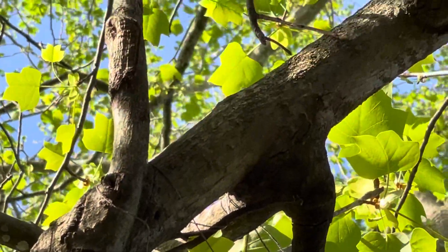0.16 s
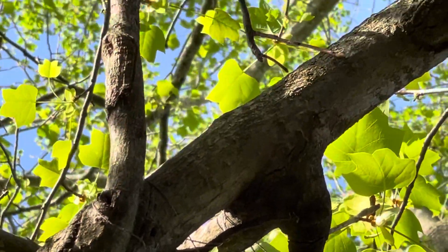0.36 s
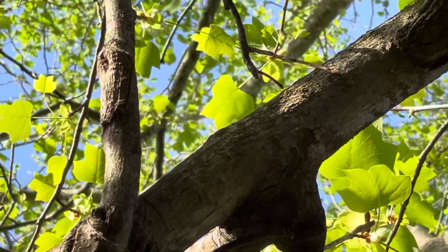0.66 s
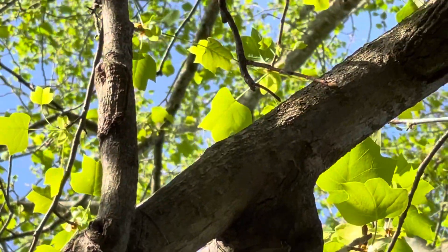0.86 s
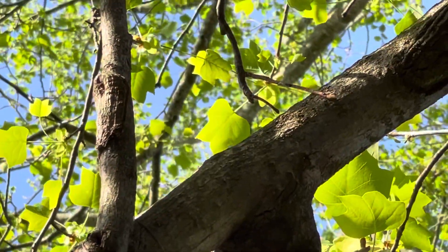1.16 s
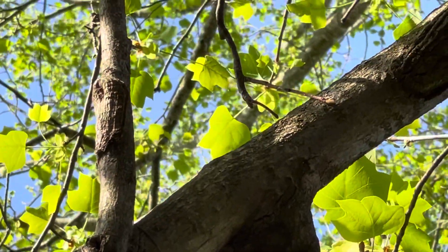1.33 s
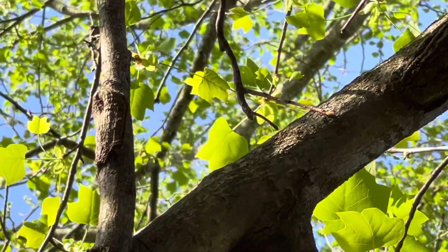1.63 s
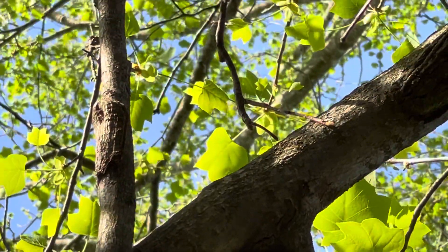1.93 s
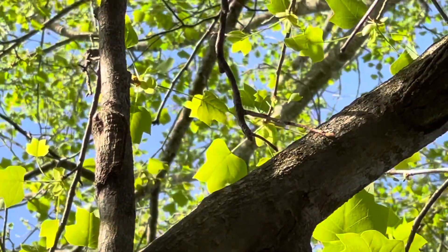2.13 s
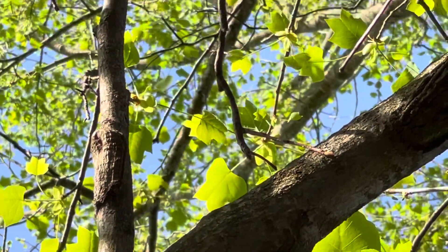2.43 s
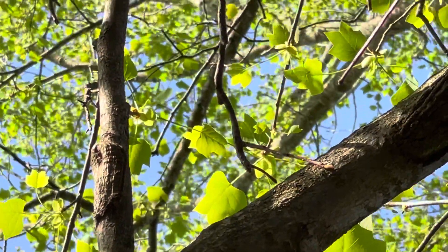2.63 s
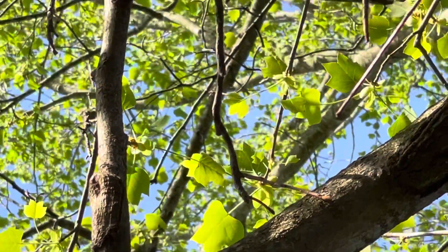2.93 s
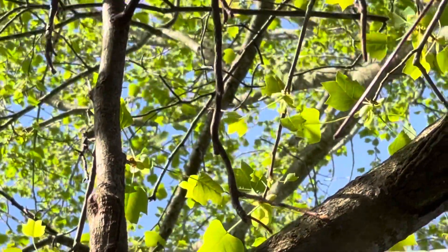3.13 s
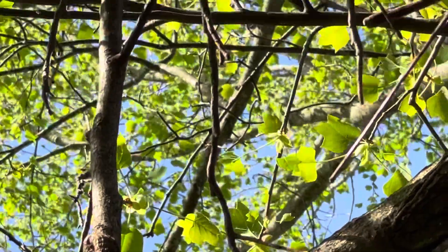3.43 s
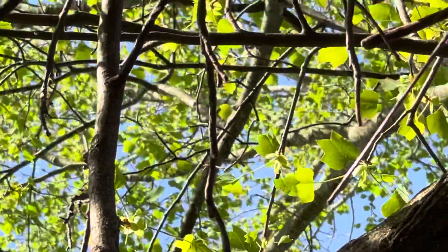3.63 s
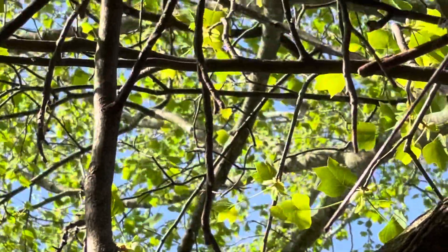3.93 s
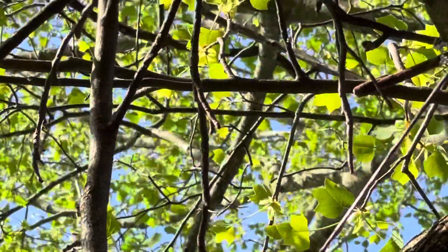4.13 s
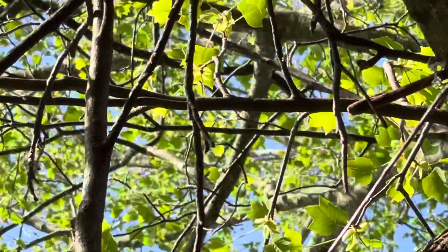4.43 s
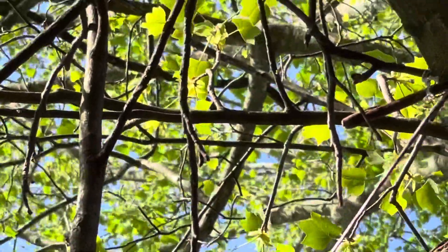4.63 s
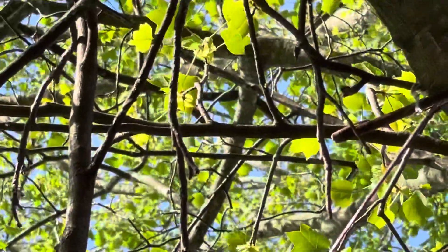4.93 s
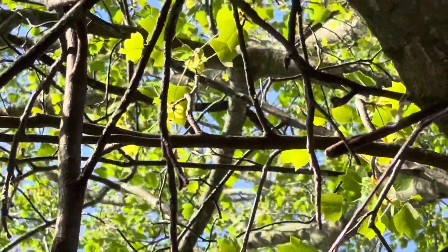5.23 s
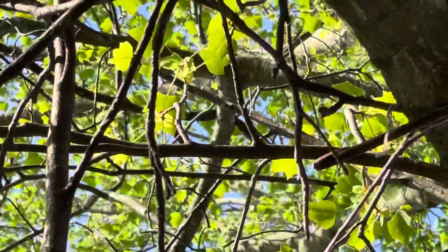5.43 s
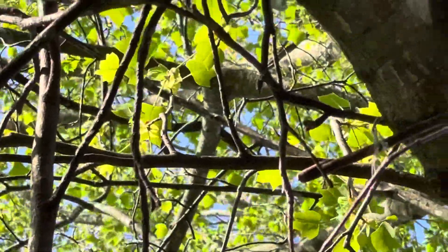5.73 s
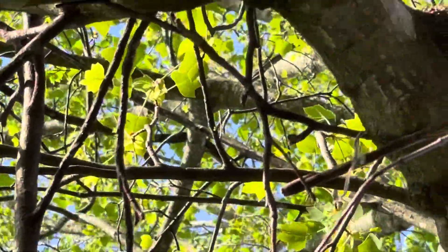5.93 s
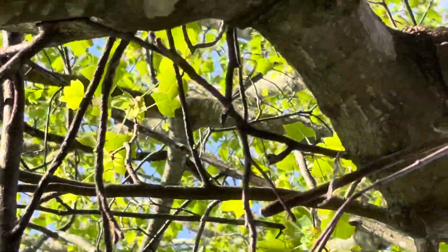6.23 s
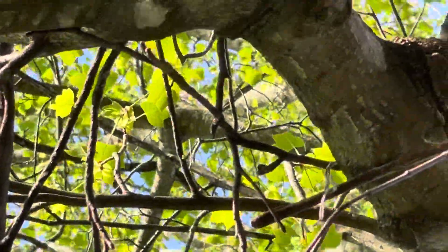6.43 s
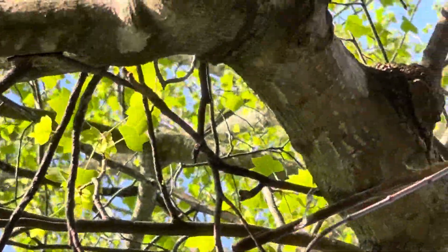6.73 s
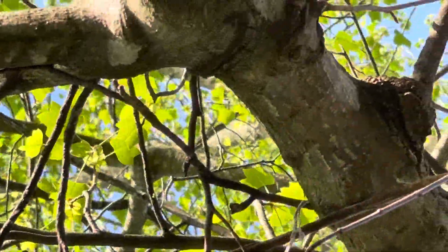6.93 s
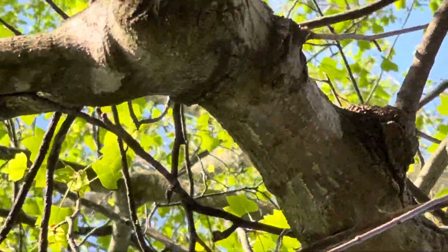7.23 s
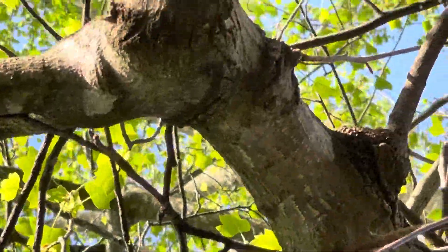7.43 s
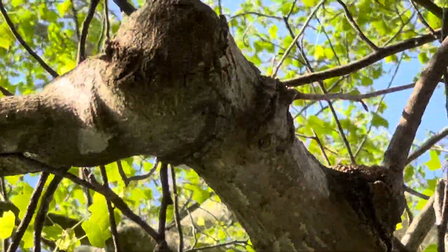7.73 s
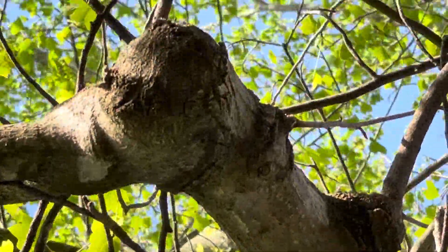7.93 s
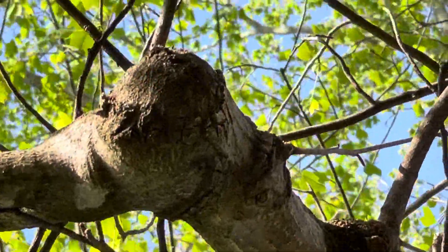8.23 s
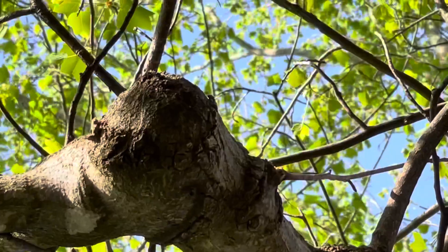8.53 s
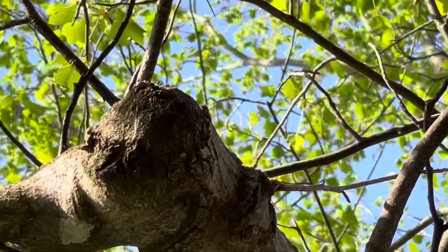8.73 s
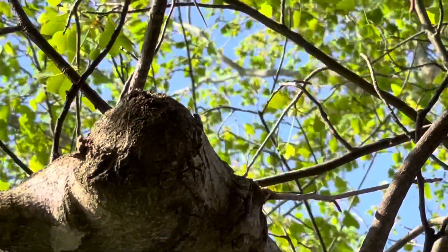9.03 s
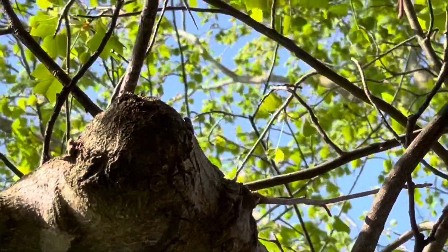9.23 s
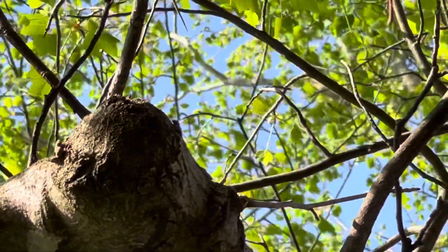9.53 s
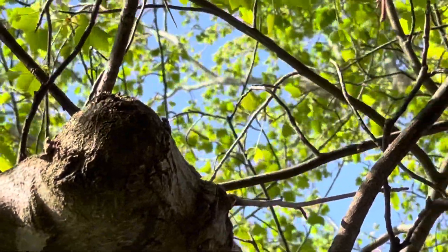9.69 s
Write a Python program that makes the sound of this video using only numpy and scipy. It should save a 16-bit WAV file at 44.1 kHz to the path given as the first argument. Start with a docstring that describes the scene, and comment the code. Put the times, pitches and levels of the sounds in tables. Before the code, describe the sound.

Outdoor birdsong, fast and changeable: bright whistles, plunging chirps and quick pips, separated by short gaps, then scratchy rasps between clear rising whistles and sustained high notes. It ends with a short two-toned note and a soft falling slur. A handheld microphone under trees also catches low wind buffets from three seconds, steady hiss, faint traffic rumble and a barely audible motor hum.

```python
"""A mockingbird in a leafy tree opens mid-note with a two-voiced whistle, a falling slur and a high swoop.
A hoarse whine, far thin replies, a second swoop and duet, and a down-sweep breaking into a growl follow.
From about 3 s harsh rasps alternate with low rising whistles, pips and long hooked notes, to a last duet and slur.
Notes are gliding sines, rasps are slaps, puffs and squeals; noise tails scatter them off trunks and leaves.
Filtered-noise gusts thump on the microphone from about 3 s, over steady hiss, traffic rumble and a motor hum."""
import sys
import numpy as np
from scipy import signal
from scipy.fft import rfft, irfft
from scipy.io import wavfile
from scipy.ndimage import uniform_filter1d, map_coordinates

SR = 44100
rng = np.random.default_rng(int(sys.argv[2]) if len(sys.argv) > 2 else 0)


def output_pcm(signal):
    """Save a mono or channel-first signal as 16-bit PCM at the path in sys.argv[1].

    Samples are clipped to [-1, 1] before scaling.
    """
    pcm = np.clip(np.atleast_2d(signal).T, -1, 1) * 32767
    wavfile.write(sys.argv[1], SR, np.round(pcm).astype(np.int16))


N = 434826
TIME = np.arange(N) / SR
FREQS = np.maximum(np.arange(N // 2 + 1) * SR / N, 1)
TOP_HZ = 15600  # nothing passes the microphone above this


def undb(db):
    """Decibels to gain."""
    return 10 ** (np.asarray(db) / 20)


def unit(x):
    """Scale to rms 1."""
    return x / np.sqrt(np.mean(x ** 2))


def curves(rows, t=TIME):
    """Each later column of a table, joined by straight lines over its first column and read at t."""
    s, *columns = np.transpose(rows)
    return [np.interp(t, s, c) for c in columns]


def spectrum(points):
    """(f/Hz, value) points spread over a log-frequency axis."""
    hz, value = np.transpose(points)
    return np.interp(np.log(FREQS), np.log(hz), value)


def colour(x, points):
    """Filter by a (f/Hz, level/dB) outline."""
    return irfft(rfft(x) * undb(spectrum(points)), N)


def walk(rate, size):
    """Smooth random wander of spread about 1, with `rate` random knots per second."""
    knots = rng.standard_normal(4096)
    return map_coordinates(knots, [np.arange(size) * rate / SR], order=3, mode="wrap")


def stereo(mid, wide):
    """Left and right from middle and side."""
    return np.array([mid + wide, mid - wide])


def side(points, waver, flutter_db, edge_s=0.0028, shake=0.0015):
    """One side of the syrinx follows (t/s, f/Hz, level/dB) points: sample indices, phase and amplitude."""
    start, end = points[0][0], points[-1][0]
    first = max(int((start - edge_s) * SR), 0)
    i = np.arange(first, int((end + edge_s) * SR))
    t = i / SR
    hz, db = curves(points, t)
    hz = uniform_filter1d(hz, int(0.0071 * SR), mode="nearest")  # muscles round the corners
    # fast slurs unsettle the membrane and turn rough; held notes stay pure
    slur_speed = np.abs(np.gradient(np.log(hz))) * SR
    roughness = waver + np.minimum(shake * slur_speed, .03)
    hz = hz * (1 + roughness * walk(371.4, len(i)))
    gate = np.clip(np.minimum(t - start, end - t) / edge_s / 2 + .5, 0, 1)
    size = np.sin(np.pi / 2 * gate) ** 2 * undb(db + flutter_db * walk(111.3, len(i)))
    return i, 2 * np.pi * np.cumsum(hz) / SR, np.sqrt(2) * size


# two-voiced notes: (start t/s, loudest t/s, end t/s, lower f/Hz, last lower f/Hz, lower level/dB,
# first upper f/Hz, upper f/Hz, upper level/dB)
DUETS = [(-.05, 0.055, .166, 3153, 3096, -40, 4200, 4146, -45),
         (1.629, 1.747, 1.807, 3105, 3170, -39.5, 3910, 4138, -45),
         (8.16, 8.197, 8.256, 3140, 2460, -43, 3440, 4313, -50)]
DUET_ONSET_DB, DUET_SCOOP = -18, 0.97  # lower voice's starting level and pitch ratio
UPPER_OVERSHOOT, UPPER_HALFWAY_DB = 1.02, -11.5  # upper voice rises past its pitch before it swells
UPPER_FADE_DB_PER_S = 230


def duet(start, loudest, end, low_hz, last_hz, low_db, first_hz, high_hz, high_db):
    """Points of the two voices: they swell together, then the lower holds and the upper fades."""
    low = [(start, DUET_SCOOP * low_hz, low_db + DUET_ONSET_DB),
           (loudest, low_hz, low_db),
           (end, last_hz, low_db)]
    high = [(start, first_hz, high_db + 2 * UPPER_HALFWAY_DB),
            ((start + loudest) / 2, UPPER_OVERSHOOT * high_hz, high_db + UPPER_HALFWAY_DB),
            (loudest, high_hz, high_db),
            (end, high_hz, high_db - UPPER_FADE_DB_PER_S * (end - loudest))]
    return low, high


# overtones, sum and difference tones of a duet: (multiple of the lower voice, multiple of the upper voice)
MIXES = [(2, -1), (-1, 2), (2, 0), (1, 1), (0, 2), (3, 0), (1, 2)]
# strength of those tones against the upper voice: (f/Hz, level/dB)
MIX_COLOUR = [(2100, -29), (5200, -22.5), (6250, -11.5), (11500, -20)]
# outline of the hoarse air in the throat, shared with the whine: (f/Hz, relative level/dB)
HOARSE = [(900, -10), (1400, -15), (3500, 6.5), (9000, -7.5), (12500, -26)]


def duets(waver=0.0046, flutter_db=2, rough_db=3.5, smear=0.34, hoarse_db=-11, lead_s=0.026, slack_db=-19):
    """Both sides load each other: rough mixture tones and hoarse air, strongest just before the peak."""
    out = np.zeros(N)
    air = unit(colour(rng.standard_normal(N), HOARSE))
    for row in DUETS:
        low, high = duet(*row)
        i, low_phase, low_size = side(low, waver, flutter_db)
        _, high_phase, high_size = side(high, waver, flutter_db)
        start, loudest, end, low_hz, *_, high_hz, high_db = row
        mixed = undb(hoarse_db) * air[i]
        for m, n in MIXES:
            db = curves(MIX_COLOUR, m * low_hz + n * high_hz)[0] + rough_db * walk(307, len(i))
            phase = m * low_phase + n * high_phase + smear * walk(600, len(i))  # radians
            mixed = mixed + undb(db) * np.sin(phase)
        strain_db = np.interp(i / SR, [start, loudest - lead_s, end], [slack_db, 0, slack_db])
        out[i] += low_size * np.sin(low_phase) + high_size * np.sin(high_phase)
        out[i] += undb(high_db + strain_db) * mixed
    return out


# rising whistles: (start t/s, end t/s, shelf f/Hz, f/Hz before the climb, top f/Hz,
# opening flick level/dB, shelf level/dB, top level/dB)
RISES = [(4.007, 4.172, 2707, 2770, 3337, -38, -44, -36),
         (5.025, 5.198, 2747, 2730, 3472, -29.5, -43.5, -34.5),
         (6.819, 7.008, 2690, 2660, 3328, -33, -50, -35)]
FLICK_HZ, DIP_HZ, DIP_DB = 3750, 2274, -4.5  # dip level is against the shelf
FLICK_S, SETTLE_S = 0.00576, .042  # bottom of the dip and start of the shelf, after the start
CLIMB_S, TOP_S = 0.077, 0.025  # start of the climb and of the held top, before the end
STEP_S, KNEE_SHARE, KNEE_DB = .014, 0.49, -4.5  # last step: length, share climbed before it, level there


def rise(start, end, shelf_hz, foot_hz, top_hz, flick_db, shelf_db, top_db):
    """A rising whistle: flick, dip, shelf, a climb that grows louder and a held top."""
    knee_hz = foot_hz + KNEE_SHARE * (top_hz - foot_hz)
    return [(start, FLICK_HZ, flick_db),
            (start + FLICK_S, DIP_HZ, shelf_db + DIP_DB),
            (start + SETTLE_S, shelf_hz, shelf_db),
            (end - CLIMB_S, foot_hz, shelf_db),
            (end - TOP_S - STEP_S, knee_hz, top_db + KNEE_DB),
            (end - TOP_S, top_hz, top_db),
            (end, top_hz, top_db)]


# short pips: (start t/s, end t/s, first f/Hz, held f/Hz, level/dB)
PIPS = [(2.141, 2.169, 1890, 2340, -51), (2.566, 2.601, 1684, 1960, -51.5), (3.612, 3.633, 7600, 8360, -53),
        (4.23, 4.263, 1744, 1965, -47), (5.25, 5.283, 1640, 2000, -46.5), (6.141, 6.155, 7140, 7840, -50.5),
        (7.064, 7.092, 1615, 2160, -45.5)]
SCOOP_SHARE, SCOOP_DB = 0.613, -14.5  # share of a pip spent rising, its starting level against the hold


def pip(start, end, first_hz, hz, db):
    """A pip scoops up to its pitch and holds it."""
    return [(start, first_hz, db + SCOOP_DB), (start + SCOOP_SHARE * (end - start), hz, db), (end, hz, db)]


# single-stroke slurs: (start t/s, end t/s, first f/Hz, middle f/Hz, last f/Hz, middle level/dB)
SLURS = [(0.165, 0.182, 3090, 2820, 2070, -49), (2.17, 2.193, 4140, 4350, 3400, -57.5),
         (2.341, 2.431, 4780, 3730, 2850, -50.5), (2.704, 2.733, 4980, 6570, 4200, -41),
         (2.728, 2.744, 3120, 2980, 2810, -51), (4.294, 4.358, 2344, 2017, 1680, -47),
         (5.329, 5.391, 2280, 1976, 1753, -46.5), (7.127, 7.209, 2240, 2123, 1670, -46),
         (8.268, 8.416, 2940, 2690, 2456, -50)]
SLUR_EDGE_DB = -7  # both ends against the middle


def slur(start, end, first_hz, middle_hz, last_hz, db):
    """One stroke through three pitches, loudest in the middle."""
    edge_db = db + SLUR_EDGE_DB
    return [(start, first_hz, edge_db), ((start + end) / 2, middle_hz, db), (end, last_hz, edge_db)]


# high swooping chirps: (start t/s, first f/Hz, trough f/Hz, crest f/Hz, last f/Hz, crest level/dB)
SWOOPS = [(0.503, 8060, 6360, 7760, 5100, -39.5), (1.378, 7330, 6430, 7430, 5120, -39)]
TROUGH_S, LIFT_S, CREST_S, SWOOP_S = 0.035, .055, 0.086, 0.11  # after the start
SWOOP_ONSET_DB, TROUGH_DB, SWOOP_END_DB = -17, -6, -12  # against the crest


def swoop(start, first_hz, trough_hz, crest_hz, last_hz, db):
    """A chirp sinks into a trough, lifts to a loud crest and plunges."""
    return [(start, first_hz, db + SWOOP_ONSET_DB),
            (start + TROUGH_S, trough_hz, db + TROUGH_DB),
            (start + LIFT_S, trough_hz, db + TROUGH_DB),
            (start + CREST_S, crest_hz, db),
            (start + SWOOP_S, last_hz, db + SWOOP_END_DB)]


# long high notes: (start t/s, landing t/s, end t/s, hook f/Hz, landing f/Hz, last f/Hz,
# hook level/dB, last level/dB)
HOOKS = [(3.639, 3.706, 3.785, 6375, 6710, 6960, -47.5, -48.5),
         (6.178, 6.226, 6.475, 4740, 6090, 6205, -39.5, -45.5)]
HOOK_S, BEND_S, RELEASE_S = 0.0112, .028, 0.021  # bottom of the hook, end of its bend, final fade
HOOK_DROP, HOOK_BEND = 1.17, 0.17  # starting pitch ratio, share of the climb made in the bend
HOOK_ONSET_DB, LANDING_DB = -22, -4.5  # against the hook, against the held note


def hook(start, landing, end, hook_hz, landing_hz, last_hz, hook_db, last_db):
    """A note drops into a hook, bends up to a soft landing and swells while it is held."""
    bend_hz = hook_hz + HOOK_BEND * (landing_hz - hook_hz)
    return [(start, HOOK_DROP * hook_hz, hook_db + HOOK_ONSET_DB),
            (start + HOOK_S, hook_hz, hook_db),
            (start + BEND_S, bend_hz, hook_db),
            (landing, landing_hz, last_db + LANDING_DB),
            (end - RELEASE_S, last_hz, last_db),
            (end, last_hz, last_db + LANDING_DB)]


def song(sharp_hz=4100):
    """All one-voiced notes, parted by their highest pitch into mellow ones and sharp ones."""
    kinds = [(rise, RISES), (pip, PIPS), (slur, SLURS), (swoop, SWOOPS), (hook, HOOKS)]
    mellow, sharp = [], []
    for shape, rows in kinds:
        for row in rows:
            note = shape(*row)
            highest = max(hz for _, hz, _ in note)
            (sharp if highest > sharp_hz else mellow).append(note)
    return mellow, sharp


# resonances that let overtones out: (f/Hz, level/dB)
LEAK = [(4600, 9.5), (6000, -3), (7800, 6), (9500, -0.5), (12300, 3)]


def whistles(notes, overtone_db, flutter_db, waver=.004):
    """Near-pure notes; the throat is best tuned on loud stretches, so overtones swell less than the note."""
    out = np.zeros(N)
    for points in notes:
        i, phase, size = side(points, waver, flutter_db)
        hz = np.gradient(phase) * SR / (2 * np.pi)
        leak = np.sqrt(size * undb(-51.0))  # moves half as many dB as the note
        out[i] += size * np.sin(phase)
        for k, db in enumerate(overtone_db, 2):
            gain = undb(db + curves(LEAK, k * hz)[0]) * (k * hz < TOP_HZ)
            out[i] += leak * gain * np.sin(k * phase)
    return out


# a falling note that breaks up: (t/s, f/Hz, level/dB of the note alone)
GROWL = [(2.422, 2830, -47.5), (2.44, 2200, -43), (2.45, 1800, -42), (2.478, 1538, -54), (2.51, 1374, -61)]


def growl(break_s=2.45, rattle_hz=350, jitter=0.117, fall_db=-3, rough_db=4):
    """The membrane starts to rattle, which stacks rough side tones above the falling note."""
    i, phase, size = side(GROWL, waver=.025, flutter_db=2.2)
    rattle = 2 * np.pi * np.cumsum(rattle_hz * (1 + jitter * walk(297, len(i)))) / SR
    side_tones = 0
    for k in range(1, 7):
        gain = undb(fall_db * k + rough_db * walk(393, len(i)))
        side_tones = side_tones + gain * np.sin(phase + k * rattle)
    broken = np.clip((i / SR - break_s) / 0.021, 0, 1)
    out = np.zeros(N)
    out[i] = size * (np.sin(phase) + broken * side_tones)
    return out


# the two squealing voices inside a rasp: (f/Hz once risen, relative level/dB)
WARBLES = [(3400, -5), (6200, -1)]
WARBLE_SCOOP, WARBLE_RISE = .74, 0.37  # starting pitch ratio, share of the rasp spent rising


def warble(size, rise_s, depth=0.063, wobble_hz=260, throb_db=4):
    """Both membranes squeal, scooping up to their pitches while they wobble and throb at random."""
    scoop = np.interp(np.arange(size) / SR, [0, rise_s], [WARBLE_SCOOP, 1])
    throb = undb(throb_db * walk(wobble_hz, size))
    voices = 0
    for hz, db in WARBLES:
        pitch = hz * scoop * (1 + depth * walk(2 * wobble_hz, size))
        voices = voices + undb(db) * np.sin(2 * np.pi * np.cumsum(pitch) / SR)
    return unit(throb * voices)


# rasps: (start t/s, loudest t/s, end t/s, peak level/dB, end level/dB, pulse rate f/Hz,
# brightness/dB per octave, share of squeal power 0-1)
RASPS = [(2.961, 2.972, 3.095, -45.5, -55, 490, 4.5, 0.4), (4.596, 4.614, 4.715, -45, -54.5, 340, 4.5, 0.3),
         (5.703, 5.723, 5.835, -41.5, -57.5, 276, 5, 0.27),
         (7.507, 7.521, 7.542, -44.5, -56, 390, 6.5, 0.14), (7.594, 7.607, 7.628, -41.5, -60, 330, 7, 0.08),
         (7.67, 7.729, 7.92, -55, -60.5, 118, 4, 0.1)]
# throat resonances of the rasp: (f/Hz, width f/Hz, level/dB)
THROAT = [(1630, 890, -6), (3400, 1860, 2.5), (5600, 2600, -1), (7700, 3900, -7)]


def rasps(chaos=0.18, pulse_s=0.0042, slap_db=-5, onset_db=20, beak_s=0.03):
    """Membranes slap, squeal and puff air into the throat: an even rattle when soft, chaotic when forced."""
    out = np.zeros(N)
    for start, top, end, db, end_db, rate, tilt_db, squeal in RASPS:
        i = np.arange(int(start * SR), int((end + 0.065) * SR))
        jitter = np.interp(db, [-48, -42], [.022, chaos])
        cycles = np.cumsum(rate * np.exp(jitter * walk(300, len(i)))) / SR
        slaps = unit(np.diff(np.floor(cycles), prepend=0))
        puff_shape = np.exp(-(cycles % 1) / rate / pulse_s)
        puffs = unit(puff_shape * rng.standard_normal(len(i)))
        f = np.arange(len(i) // 2 + 1) * SR / len(i)
        throat_power = sum(undb(2 * gain) / (1 + ((f - hz) / width * 2) ** 2) ** 2
                           for hz, width, gain in THROAT)
        tilt = undb(tilt_db * np.log2(f + 800))
        shaped = rfft(undb(slap_db) * slaps + puffs) * np.sqrt(throat_power) * tilt
        # the beak opens after the start and lets the treble out
        closed = irfft(shaped / (1 + (f / 5500) ** 8), len(i))
        opening = np.minimum((i - i[0]) / SR / beak_s, 1) ** 2
        rattle = closed + opening * (irfft(shaped, len(i)) - closed)
        squeals = warble(len(i), WARBLE_RISE * (end - start))
        voice = np.sqrt(1 - squeal) * unit(rattle) + np.sqrt(squeal) * squeals
        effort_db = np.interp(i / SR, [start, top, end, i[-1] / SR], [db - onset_db, db, end_db, end_db - 54])
        out[i] += voice * undb(effort_db)
    return out


# a soft hoarse whine: (t/s, level/dB)
WHINE = [(.768, -62.5), (.8, -53.5), (.98, -66), (1.09, -63), (1.115, -85)]
# its unrelated squeaky bands, which glide and level off: (first f/Hz, final f/Hz, relative level/dB)
WHINE_BANDS = [(1550, 1200, -9), (1930, 1800, -5), (2140, 2200, -8), (3240, 2540, -1.5), (3770, 3580, -8)]


def whine(jitter=0.0244, sag_s=.085, swell_db=4, grain_db=3.0, air_db=1, closing_db_per_s=15):
    """Squeaky bands come and go over grainy air that fades as the beak closes."""
    i = np.arange(int(WHINE[0][0] * SR), int(WHINE[-1][0] * SR))
    age = (i - i[0]) / SR
    voice = 0
    for first_hz, last_hz, db in WHINE_BANDS:
        glide_hz = last_hz + (first_hz - last_hz) * np.exp(-age / sag_s)
        hz = glide_hz * (1 + jitter * walk(500, len(i)))
        gain = undb(db + swell_db * walk(25, len(i)))
        voice = voice + gain * np.sin(2 * np.pi * np.cumsum(hz) / SR)
    air = unit(colour(rng.standard_normal(N), HOARSE))[i] * undb(air_db - closing_db_per_s * age)
    grain = undb(grain_db * walk(420, len(i)))
    out = np.zeros(N)
    out[i] = unit((unit(voice) + air) * grain) * undb(curves(WHINE, i / SR)[0])
    return out


# slurs from far off: (start t/s, end t/s, first f/Hz, last f/Hz, level/dB going into the trees)
FAR_NOTES = [(0.91, 1.042, 6530, 7240, -67), (2.465, 2.68, 6390, 7760, -71),
             (3.307, 3.527, 5950, 7640, -70.5)]


def far_birds():
    """Straight glides without overtones, their pitch roughened by a wide waver."""
    glides = [[(start, first, db), (end, last, db)] for start, end, first, last, db in FAR_NOTES]
    return whistles(glides, overtone_db=[], flutter_db=3.0, waver=0.065)


def trees(x, t60, build_s=0.001, grain_db=4):
    """Echoes off trunks and leaves: a grainy tail of unit energy, almost the same at both ports."""
    t = np.arange(int(.8 * SR)) / SR
    echoes = rng.standard_normal((2, len(t))) * undb(grain_db * rng.standard_normal(len(t)))
    echoes = echoes * undb(-60 * t / t60) * (1 - np.exp(-t / build_s))
    mid, wide = (signal.fftconvolve(x, e / np.linalg.norm(e))[:N] for e in echoes)
    return stereo(mid, 0.056 * wide)


def eddies(edge_hz, size, low_hz=46):
    """Turbulent pressure at the port: noise with a lower and an upper edge, leaning to the bass."""
    f = np.maximum(np.arange(size // 2 + 1) * SR / size, 1)
    shape = 1 / np.sqrt((1 + (low_hz / f) ** 6) * (1 + (f / edge_hz) ** 6) * (1 + f / low_hz))
    return irfft(rfft(rng.standard_normal(size)) * shape, size)


# buffets on the microphone: (t/s, level/dB before the thump trim, upper edge f/Hz)
BUFFETS = [(2.925, -34.5, 63), (3.737, -32, 82.4), (4.264, -30.5, 79), (4.697, -24, 66), (4.785, -24.5, 68),
           (5.091, -19.5, 91), (5.47, -35.5, 158), (6.635, -33, 202), (6.956, -35.5, 256), (6.98, -25, 88),
           (7.378, -30.5, 256), (7.613, -29, 230), (7.704, -29, 207), (8.476, -32, 210), (8.547, -32, 220),
           (9.526, -29.5, 59)]
# the breeze between them: (t/s, level/dB before the breeze trim)
BREEZE = [(3.3, -48), (3.7, -42), (5.3, -41), (5.6, -50), (6.4, -58), (6.6, -46), (7.8, -38), (8.6, -35),
          (8.9, -58)]


def wind(length_s=0.012, gusty_db=3, snap=0.57, breeze_trim_db=-3.0, thump_trim_db=-9):
    """A fluttering breeze that brightens from 5.6 to 7.6 s, and single eddies that hit the port."""
    fast = np.interp(TIME, [5.6, 7.6], [0, 1])
    flow = np.sqrt(1 - fast) * unit(eddies(92.0, N)) + np.sqrt(fast) * unit(eddies(131.0, N))
    out = flow * undb(curves(BREEZE)[0] + gusty_db * walk(22, N) + breeze_trim_db)
    t = np.arange(-4096, 4096) / SR
    for s, db, edge_hz in BUFFETS:
        # the core of an eddy passes faster than its wake
        wake = eddies(edge_hz, len(t)) / np.cosh(t / length_s)
        core = eddies(0.39 * edge_hz, len(t), low_hz=edge_hz) / np.cosh(t / 0.0043)
        thump = unit(unit(wake) + snap * unit(core))
        out[int(s * SR) + np.arange(len(t)) - len(t) // 2] += thump * undb(db + thump_trim_db)
    return out


# outline of the broadband hiss: (f/Hz, relative level/dB)
HISS = [(310, -0.5), (700, -8.5), (2640, -17), (8580, -29.5), (13000, -36)]
HISS_DB = -58.5  # after the first seconds
# rumble of distant traffic: (t/s, level/dB)
TRAFFIC = [(0, -51.5), (6.3, -50), (9, -66)]
# outline of the rumble: (f/Hz, relative level/dB)
TRAFFIC_COLOUR = [(25, 5), (60, -4.5), (95, 0.5), (220, -13), (900, -64.5)]
# a far motor's hum: (t/s, level/dB)
HUM = [(2.4, -78), (2.8, -69), (5.3, -63.5), (5.7, -77)]
HUM_HZ = 313


def background(hiss_wide=0.42, traffic_wide=0.067, faint_db=-3, dull_db=-5):
    """Steady broadband hiss, fainter and duller in the first seconds, with a low rumble and a hum under it."""
    noise = [unit(colour(rng.standard_normal(N), HISS)) for _ in range(2)]
    full = stereo(noise[0], hiss_wide * noise[1])
    dull = undb(faint_db) * colour(full, [(4200, 0.063), (5500, dull_db)])
    blend = np.interp(TIME, [1.8, 4.2], [0, 1])
    hiss = blend * full + (1 - blend) * dull
    road = [unit(colour(rng.standard_normal(N), TRAFFIC_COLOUR)) for _ in range(2)]
    rumble = stereo(road[0], traffic_wide * road[1])
    hum = np.sqrt(2) * np.sin(2 * np.pi * np.cumsum(HUM_HZ * (1 + 0.0118 * walk(25, N))) / SR)
    return (hiss * undb(HISS_DB + .5 * walk(2.27, N))
            + rumble * undb(curves(TRAFFIC)[0] + walk(3.7, N))
            + hum * undb(curves(HUM)[0] + 2 * walk(2.5, N)))


# leaves throw back short waves most strongly: (f/Hz, level/dB)
LEAF_ECHO = [(1900, -9.5), (3300, -8), (6000, -1)]
# how far the left port leads the right for the birds: (f/Hz, phase/rad)
PORT_PHASE = [(2300, 0.37), (4200, 0.68), (6800, 0.1), (8000, -1)]


def scene():
    """The singer, its echoes, far birds, wind and background."""
    low_notes, high_notes = song()
    mellow = whistles(low_notes, overtone_db=[-29.5, -33, -39, -30, -31], flutter_db=4.0)
    sharp = whistles(high_notes, overtone_db=[-17], flutter_db=2.5)
    tonal = mellow + sharp + duets() + growl()
    harsh = rasps() + whine()
    # the far birds arrive only by way of the trees
    echoes = trees(colour(tonal, LEAF_ECHO) + undb(-2.5) * harsh + far_birds(), t60=0.31)
    birds = tonal + harsh + echoes
    lead = np.exp(.5j * np.outer([1, -1], spectrum(PORT_PHASE)))  # half the lead on each side
    return irfft(rfft(birds) * lead, N) + stereo(wind(), 0.2 * wind()) + background()


# the microphone's colour: (f/Hz, level/dB)
MIC = [(25, -17.5), (52, -2.5), (9500, 3.5), (10350, -27.5), (11000, 2.5), (12400, -3.5), (13600, -24)]


def record(dry):
    """The microphone port notches the treble and the top is cut."""
    top_cut = signal.ellip(8, .2, 70, TOP_HZ, fs=SR, output="sos")
    return signal.sosfilt(top_cut, colour(dry, MIC))


dry = scene()
out = record(dry)
output_pcm(out)
```